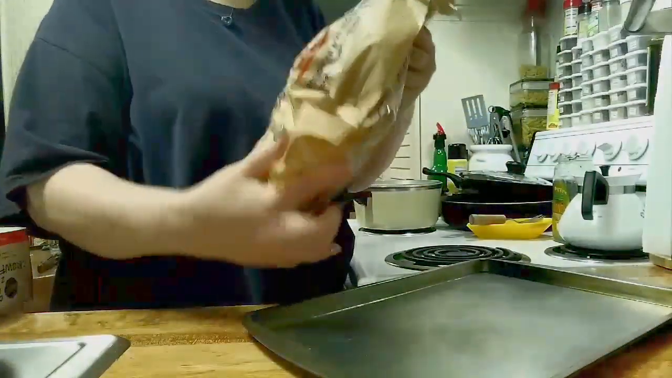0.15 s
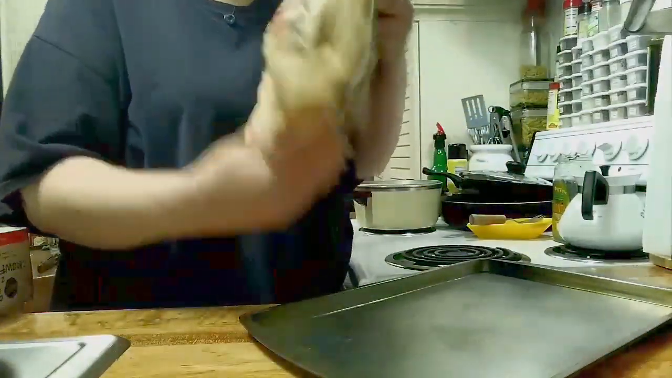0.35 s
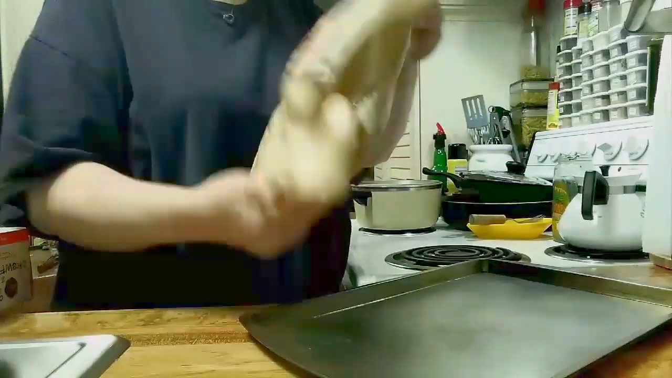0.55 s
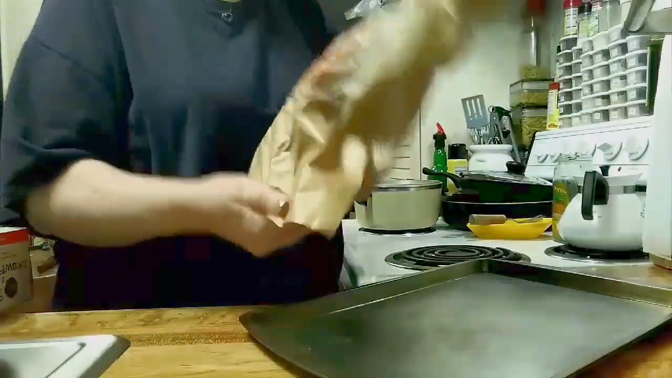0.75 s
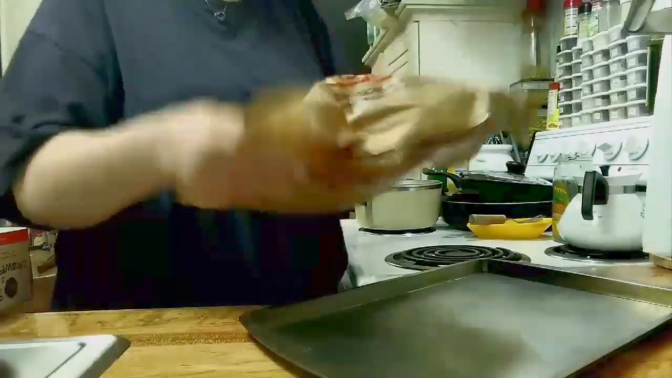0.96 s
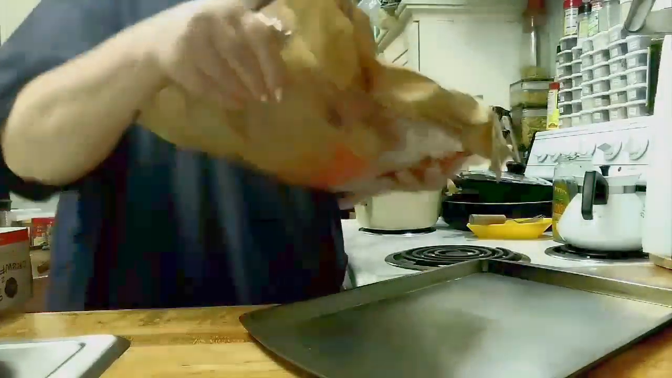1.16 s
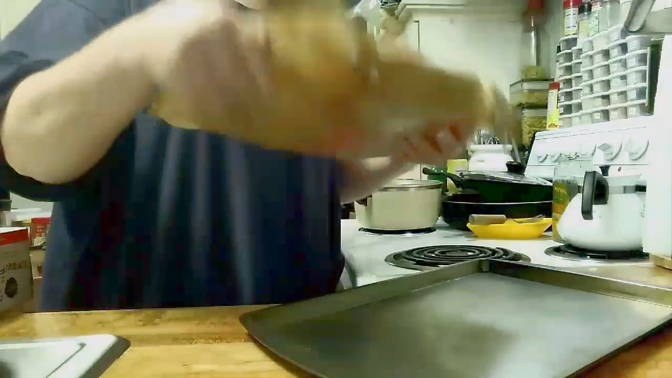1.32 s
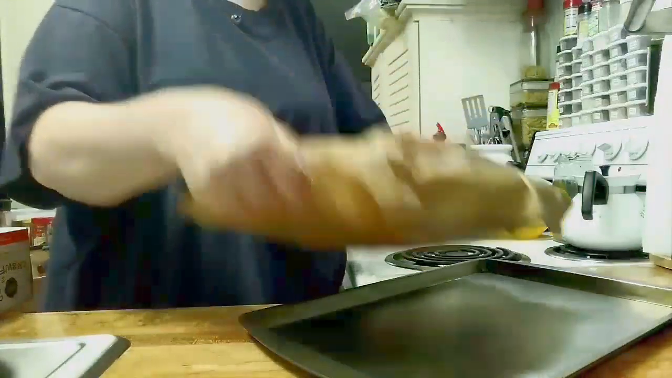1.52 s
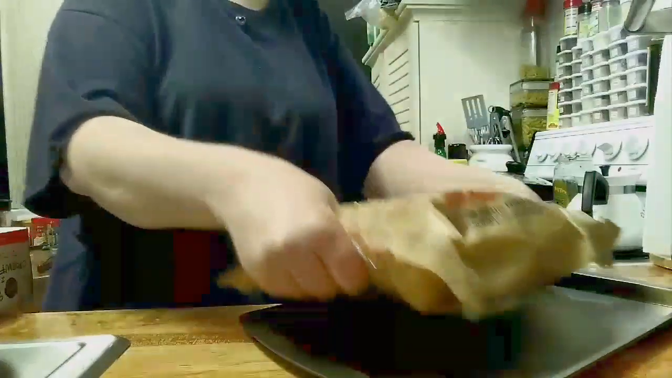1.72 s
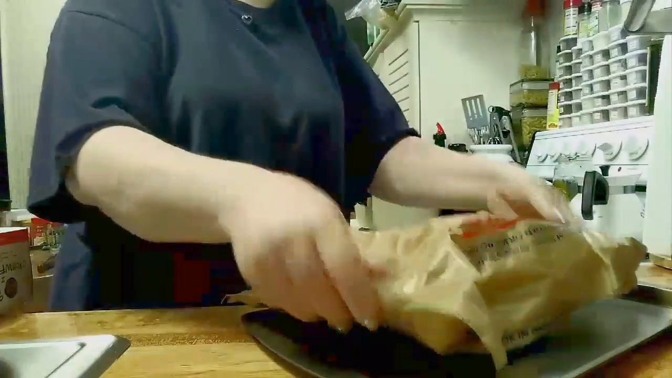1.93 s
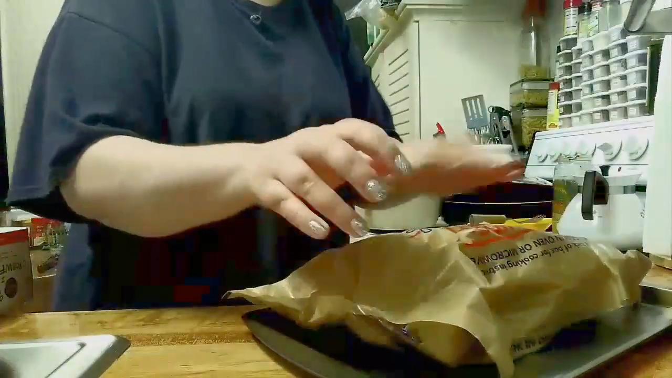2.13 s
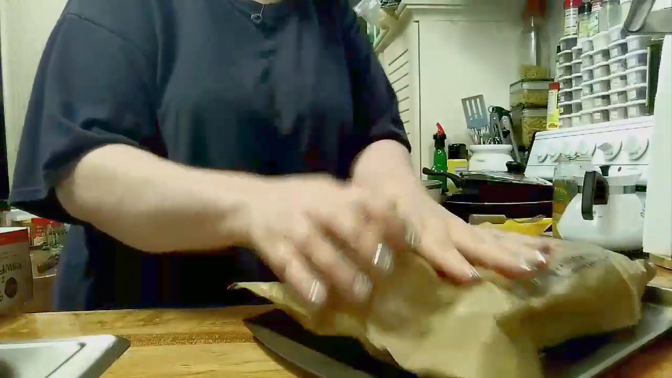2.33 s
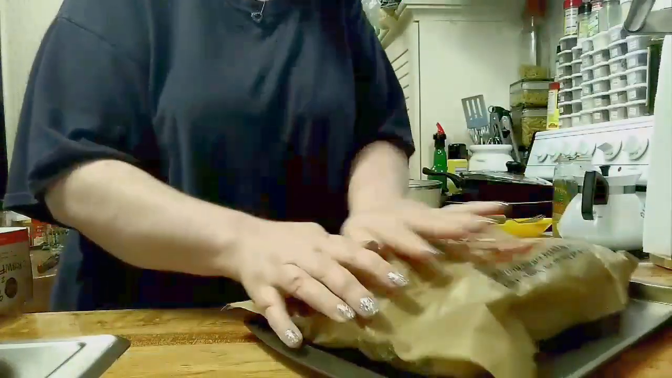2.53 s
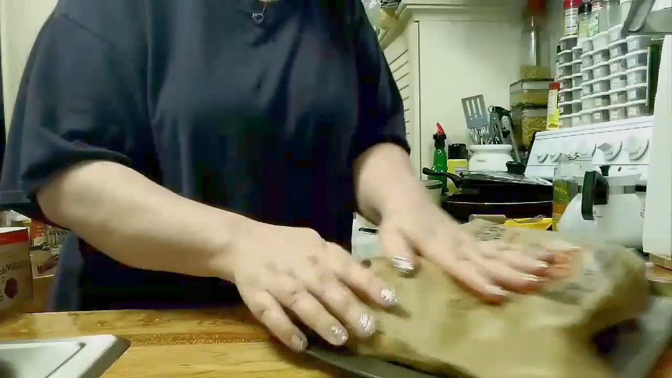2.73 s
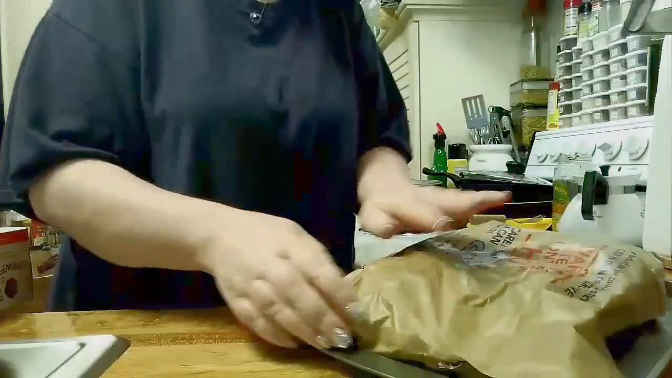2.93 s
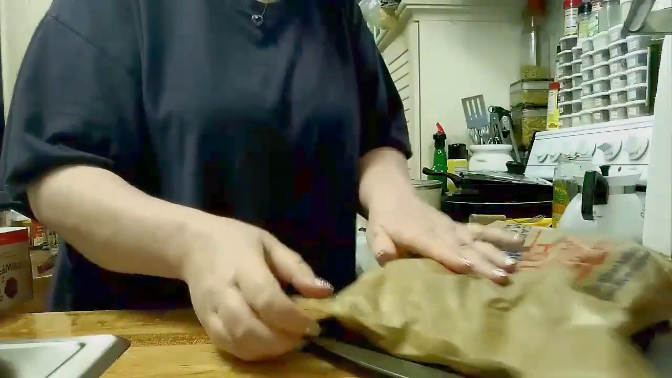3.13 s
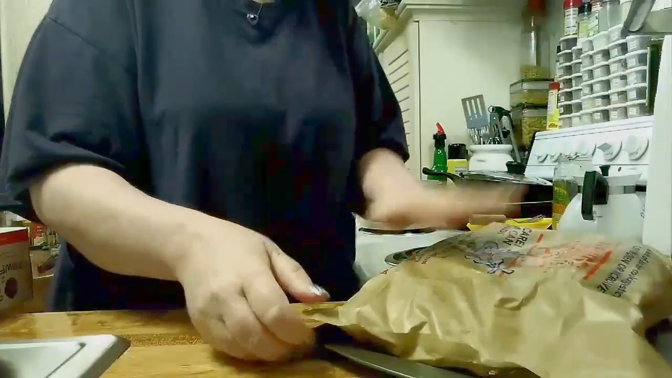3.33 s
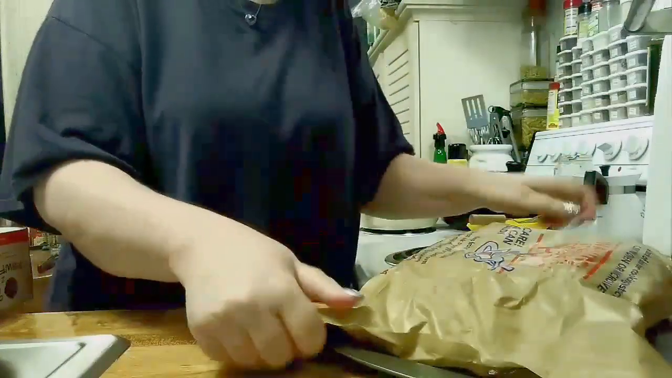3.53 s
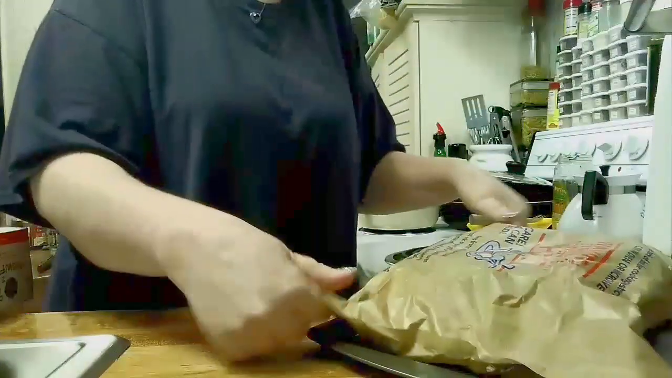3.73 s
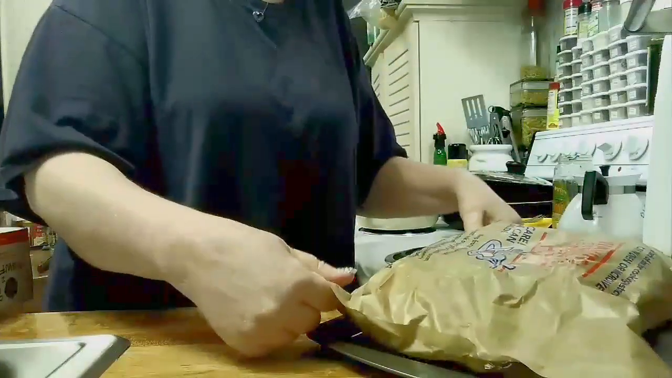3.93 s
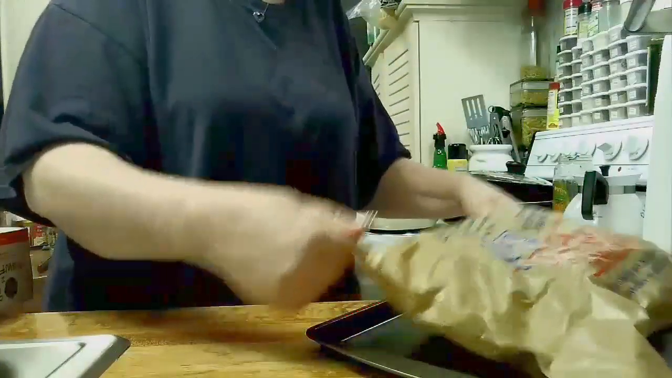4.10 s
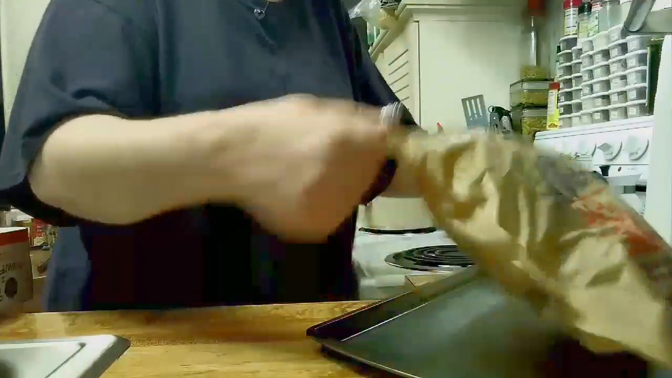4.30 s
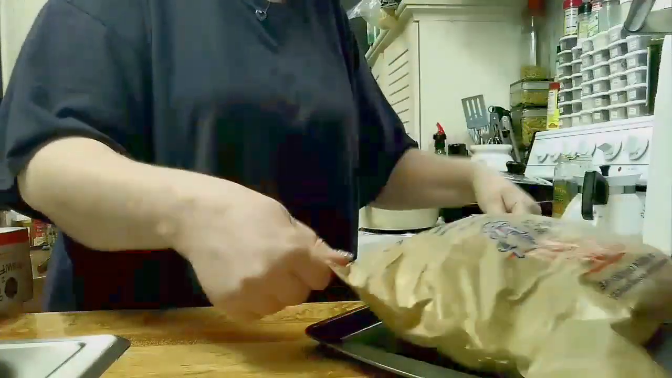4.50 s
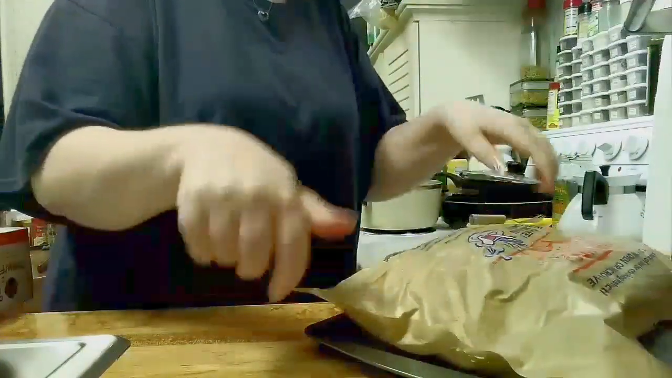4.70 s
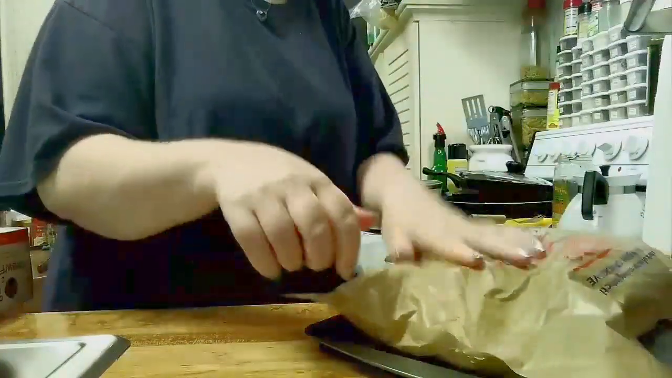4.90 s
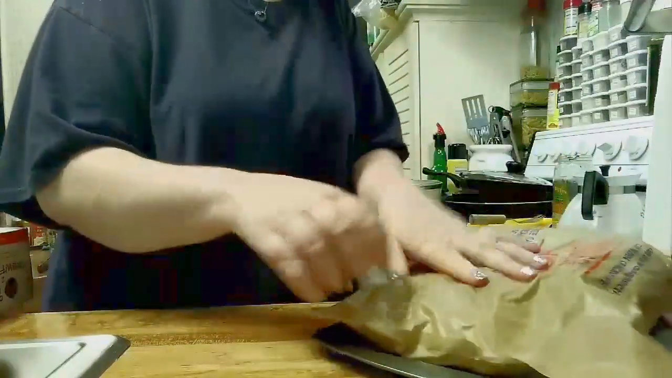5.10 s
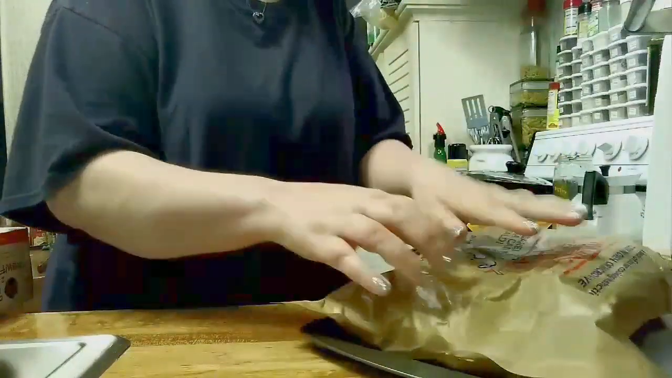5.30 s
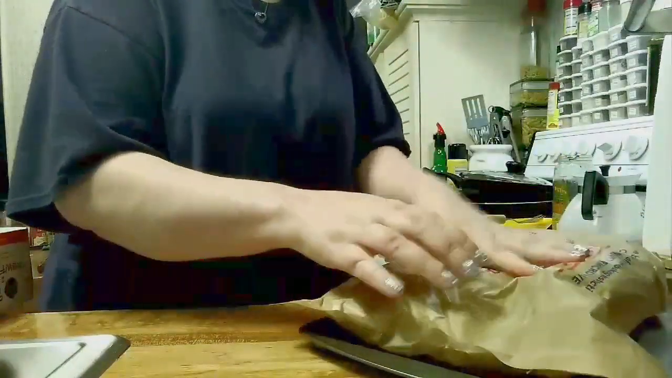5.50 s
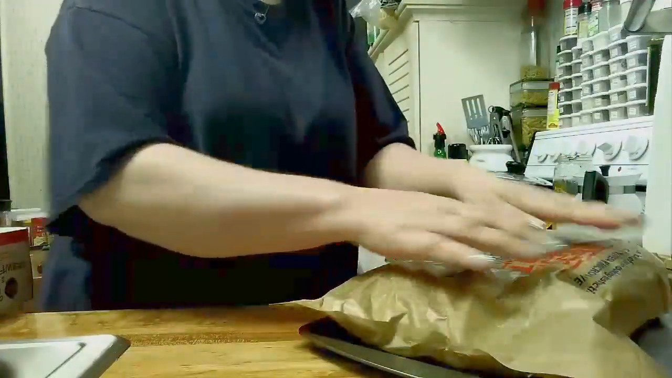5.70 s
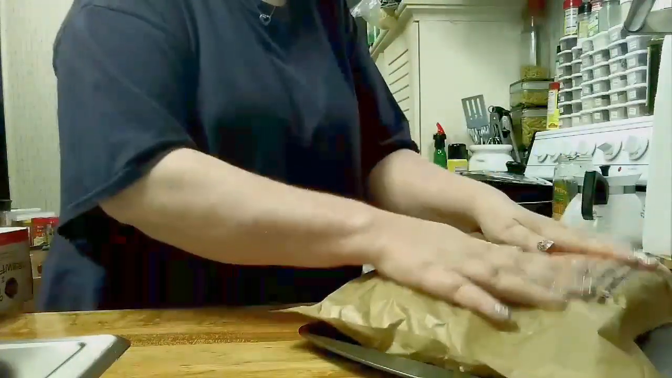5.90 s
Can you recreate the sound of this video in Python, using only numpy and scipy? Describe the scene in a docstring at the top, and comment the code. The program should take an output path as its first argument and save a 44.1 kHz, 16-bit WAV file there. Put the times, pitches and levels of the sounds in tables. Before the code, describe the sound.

Loud, continuous crisp paper crinkling comes first, full of tiny clicks and hard cracks. Then the bag is set down with cushioned thumps, and hand presses make separate crackling bursts. A near lull holds small ticks and a faint tray scrape; one end is lifted with a swelling rustle and shifting contents, then it settles into sparse soft crackles. Close microphone, short kitchen reflections, faint low room rumble.

```python
"""A stiff paper cooking bag is shaken and turned in the hands, laid on a baking tray, patted, tugged and patted again.
Its creases buckle in swarms of tiny filtered-noise clicks, with single loud snaps among them and popping panels.
The contents slide and thud as dull noise over low decaying sines; the dragged tray rings faintly from random slips.
A small kitchen answers with short noise echoes over a faint low rumble, heard by one nearby microphone."""
import sys
import numpy as np
from scipy import signal
from scipy.fft import rfft, irfft, next_fast_len
from scipy.io import wavfile
from scipy.ndimage import uniform_filter1d, map_coordinates

SR = 44100
rng = np.random.default_rng(int(sys.argv[2]) if len(sys.argv) > 2 else 0)


def log_audio(samples):
    """Write samples as a 16-bit WAV file to the path given in sys.argv[1]."""
    # one column per channel
    frames = np.atleast_2d(samples).T
    # limit to full scale, then quantise
    limited = np.clip(frames, -1, 1)
    pcm = np.round(limited * 32767).astype(np.int16)
    wavfile.write(sys.argv[1], SR, pcm)


N = 262394  # length in samples


def amp(db):
    """Decibels to gain."""
    return 10 ** (np.asarray(db) / 20)


def unit(x):
    """Scale to rms 1."""
    return x / np.sqrt(np.mean(x ** 2) + 1e-20)


def along(points, hz):
    """Read (Hz, value) points on a log frequency axis."""
    point_hz, value = np.transpose(points)
    return np.interp(np.log(hz + 1), np.log(point_hz + 1), value)


def curve(points):
    """Read (s, value) points at every sample."""
    return np.interp(np.arange(N) / SR, *np.transpose(points))


def wobble(rate):
    """A smooth random curve, rate knots a second."""
    knots = rng.standard_normal(int(N * rate / SR) + 4)
    return map_coordinates(knots, [np.arange(N) * rate / SR])


def coloured(x, spectrum, size=4096):
    """Pass x through a causal (minimum-phase) filter of unit energy with the given spectrum."""
    cepstrum = irfft(np.log(amp(along(spectrum, np.fft.rfftfreq(size, 1 / SR)))))
    # folding the cepstrum forward in time makes the filter causal
    cepstrum[1:size // 2] *= 2
    cepstrum[size // 2 + 1:] = 0
    kernel = irfft(np.exp(rfft(cepstrum)))
    return signal.oaconvolve(x, kernel / np.linalg.norm(kernel))[:len(x)]


def add(track, s, sound):
    """Mix a sound into the track at time s."""
    part = track[max(round(s * SR), 0):][:len(sound)]
    part += sound[:len(part)]


def burst(t60, size=2048):
    """Dense damped ringing: noise that falls 60 dB in t60 seconds."""
    return rng.standard_normal(size) * amp(-60 * np.arange(size) / SR / t60)


def swell(ring, rise_s):
    """Let a ring build up with the time constant rise_s."""
    return ring * (1 - np.exp(-np.arange(len(ring)) / SR / rise_s))


# colour of the room's background: pitch_hz, level_db (relative)
ROOM_COLOUR = [(18, -31), (30, -13), (70, 0.5), (110, -9), (190, -6), (340, -4.5), (600, -13), (900, -23),
               (3580, -30), (12000, -20.5), (16000, -27)]
AIR_DB = -66.5  # rms level


def air():
    """The faint steady background of the room: noise coloured mostly to a low rumble."""
    return amp(AIR_DB) * unit(coloured(rng.standard_normal(N), ROOM_COLOUR))


# decay of the kitchen's tail: pitch_hz, t60_s
ROOM_DECAY = [(150, 0.24), (600, 0.27), (2000, 0.21), (6000, 0.15), (14000, 0.2)]


def room_tail():
    """Noise whose frequency bands each die away at the room's own rate."""
    hz, t, z = signal.stft(rng.standard_normal(SR // 3), SR, nperseg=256)
    decay = amp(-60 * t / along(ROOM_DECAY, hz)[:, None])
    return signal.istft(z * decay, SR, nperseg=256)[1]


def kitchen(x, near_db=-6.5, near_t60=0.026, wall_db=-13.0, room_db=-12):
    """Counter and tray reflect at once, then the nearest wall and a short tail; paths change as the bag moves."""
    out = np.zeros(N)
    hop = SR // 10  # new paths fade in every tenth of a second
    for start in range(0, N + hop, hop):
        first = max(start - hop, 0)
        part = x[first:start + hop]
        part = part * np.cos(np.pi / 2 * (first + np.arange(len(part)) - start) / hop)
        # response, level in dB, delay in s
        paths = [(burst(near_t60), near_db, .0014),
                 (burst(0.0028), wall_db, .0064),
                 (room_tail(), room_db, .0067)]
        for response, db, delay in paths:
            echo = signal.fftconvolve(part, response / np.linalg.norm(response))
            add(out, first / SR + delay, amp(db) * echo)
    return x + out


# resonances of the baking tray: pitch_hz, level_db (relative), t60_s
TRAY_MODES = [(511, -4, 0.065), (723, -6, 0.057), (1074, 0, 0.054), (1735, 9, .045), (1920, 4, 0.02),
              (3700, 9, 0.008)]
# strength of the drag under the bag: time_s, level_db
TRAY_DRAG = [(3.3, -86), (3.325, -67), (3.35, -51), (3.41, -55), (3.429, -46), (3.48, -82), (3.5, -100)]


def tray(slip_rate=900):
    """The dragged tray sticks and slips: random impulses ring its modes faintly and roughly."""
    t = np.arange(SR // 4) / SR
    ring = sum(amp(db - 60 * t / t60) * np.sin(2 * np.pi * hz * t) for hz, db, t60 in TRAY_MODES)
    slips = (rng.random(N) < slip_rate / SR) * rng.uniform(-1.9, 1, N)
    scrape = signal.fftconvolve(slips, ring)[:N]
    return amp(curve(TRAY_DRAG)) * unit(scrape)


# the filled bag lands or is patted: start_s, level_db (relative)
PAT_HITS = [(1.851, -36), (2.152, -39), (2.34, -39), (2.457, -41), (2.62, -47), (2.873, -32.5),
            (2.915, -37), (4.229, -34), (4.498, -38.5), (4.806, -33), (5.262, -29)]
# boom of the counter and of the air in the bag: pitch_hz, level_db (relative)
BOOM_MODES = [(62, 1), (162, 0)]
# dull colour of the moving contents, also for filling(): pitch_hz, level_db (relative)
CONTENTS_COLOUR = [(25, -25), (60, -12.5), (120, 5), (200, 1), (310, 8), (450, 4.5), (900, -5.5),
                   (3000, -77)]
CUSHION_S, THUD_T60 = .008, .2  # rise time constant and decay of the cushioned thud, s


def pats(level_db=-7.0, rattle_db=-9):
    """The soft filling thuds on the tray: counter and bag boom as sines, the contents shudder as noise."""
    out = np.zeros(N)
    t = np.arange(SR // 3) / SR
    for s, db in PAT_HITS:
        boom = np.zeros(len(t))
        for hz, level in BOOM_MODES:
            scattered_hz = hz * rng.normal(1, 0.073)
            boom += amp(level - 60 * t / THUD_T60) * np.sin(2 * np.pi * scattered_hz * t)
        shudder = coloured(burst(THUD_T60, size=len(t)), CONTENTS_COLOUR)
        thud = swell(boom + amp(rattle_db) * shudder, CUSHION_S)
        add(out, s, amp(db + level_db) * thud)
    return out


# how freely the contents move, loose in the air, still on the tray, sliding when tilted:
# time_s, level_db (relative)
CONTENTS_FREEDOM = [(1.3, -1), (1.5, -1.5), (3.15, -4), (3.25, -20), (3.84, -22), (3.9, 3), (4.3, 9),
                    (4.55, 1.5), (5.0, 1.5)]


def filling(hollow, level_db=-50, follow=0.6, inertia_s=0.031, lump_db=3):
    """The contents slide and bump dully on the paper walls: lumpy noise follows the panels sluggishly."""
    sluggish = uniform_filter1d(hollow, int(inertia_s * SR) + 1)
    level = curve(CONTENTS_FREEDOM) + follow * (sluggish + 30)
    slide = coloured(rng.standard_normal(N), CONTENTS_COLOUR)
    lumps = unit(amp(lump_db * wobble(35)) * slide)
    return amp(level + level_db) * lumps


FOLD_RUN_S = .0014  # time the buckle takes to run along its fold


def snap(t60, spectrum, tone_db):
    """One quick ring of a fold with a tone of its own; its energy equals 2 ms at rms 1."""
    own = [(hz, db + rng.normal(0, tone_db)) for hz, db in spectrum]
    t = np.arange(2048) / SR
    running = np.minimum(2 * t / FOLD_RUN_S, 1) * amp(-60 * np.maximum(t - FOLD_RUN_S, 0) / t60)
    ring = coloured(running * rng.standard_normal(len(t)), own, size=1024)
    return ring / np.linalg.norm(ring) * np.sqrt(SR / 500)


# bright colour of a snapping fold: pitch_hz, level_db (relative)
CRACK_COLOUR = [(2000, -22), (5000, -11.5), (9000, -5), (11800, 3), (16000, -12)]
CRACK_T60 = .007  # s


def crack(tone_db):
    """A fold snaps through: a sharp noise crack that is over almost at once."""
    return snap(CRACK_T60, CRACK_COLOUR, tone_db)


# hollow colour of a flipping panel: pitch_hz, level_db (relative)
POP_COLOUR = [(60, -22), (200, -17), (300, -9.5), (540, 1), (800, -5), (1300, 0), (2100, 0), (2800, -3),
              (4200, -4.5), (6000, -14.5), (10000, -15)]
# the panel's note: centre pitch (Hz), scatter (octaves), share of the pop's power (0-1), decay (s)
NOTE_HZ, NOTE_OCTAVES, NOTE_SHARE, NOTE_T60 = 1850, .2, .16, .012


def panel_pop(t60):
    """A panel flips: a broad slap and a brief sine note, higher or lower with the panel's size."""
    slap = snap(t60, POP_COLOUR, tone_db=1.0)
    t = np.arange(len(slap)) / SR
    hz = NOTE_HZ * 2 ** rng.normal(0, NOTE_OCTAVES)
    note = swell(np.sin(2 * np.pi * hz * t) * amp(-60 * t / NOTE_T60), FOLD_RUN_S / 2)
    return np.sqrt(1 - NOTE_SHARE) * slap + np.sqrt(NOTE_SHARE) * unit(note) * slap.std()


# large folds that snap through: start_s, crack_db (relative), pop_db (relative)
LARGE_SNAPS = [(0.002, -14, -35), (0.0102, -13, -41), (0.016, -18.5, -41), (0.031, -19.5, -43),
               (0.0406, -19, -37.5), (0.053, -16, -48), (0.0665, -19, -46), (0.115, -18.5, -48),
               (0.129, -24, -42), (0.1418, -17, -32), (0.165, -22, -47), (0.184, -17, -37),
               (0.312, -19, -29.5), (0.3396, -18.5, -25), (0.441, -12.5, -37), (0.61, -18, -33.5),
               (0.7117, -22, -36), (0.9463, -20, -37), (0.9712, -18, -33), (1.168, -14.5, -28),
               (1.266, -18.5, -31), (1.3555, -18, -44), (1.3649, -23.5, -44), (1.3937, -24, -28.5),
               (1.4328, -19.5, -31.5), (1.4697, -16.5, -44.5), (1.5013, -25, -31), (1.5178, -19, -32),
               (1.5513, -24.5, -40), (1.565, -28.5, -47), (1.6007, -27, -25), (1.624, -24, -46),
               (1.6776, -18.5, -29), (1.681, -26.5, -32.5), (1.7282, -24, -46), (1.742, -27, -44.5),
               (1.755, -24.5, -35), (1.7724, -20.5, -33.5), (1.803, -17.5, -48), (1.8264, -18.5, -37),
               (1.9178, -21, -29), (1.9895, -30, -43), (2.042, -38, -50), (2.0553, -22.5, -33),
               (2.1253, -20, -30), (2.215, -14.5, -36), (2.2204, -14.5, -24), (2.325, -23, -35.5),
               (2.34, -18.5, -16.5), (2.3706, -21, -36), (2.4155, -18, -41), (2.4199, -18.5, -26),
               (2.4452, -21, -40.5), (2.4572, -27, -24), (2.553, -17.5, -36.5), (2.6168, -25.5, -34),
               (2.6862, -21, -30.5), (2.8374, -38.5, -43.5), (2.879, -30.5, -33.5), (2.902, -27, -32),
               (2.914, -15.5, -31.5), (3.0016, -16.5, -29.5), (3.0647, -32, -30), (3.0816, -23.5, -26.5),
               (3.139, -25, -40), (3.147, -29, -26), (3.3823, -48, -39), (3.4005, -37, -45),
               (3.419, -28, -28), (3.65, -26.5, -35), (3.6905, -37, -32), (3.6993, -32, -28),
               (3.7088, -31, -42), (3.8025, -41, -43), (3.8256, -15.5, -34), (3.864, -32, -30),
               (3.9551, -25.5, -27), (4.002, -19, -38), (4.019, -19, -37), (4.0411, -22.5, -32.5),
               (4.111, -19.5, -28), (4.1608, -28, -23), (4.184, -24.5, -30), (4.258, -11, -30),
               (4.352, -20.5, -24.5), (4.3823, -25, -34), (4.4424, -33, -30.5), (4.456, -32, -27.5),
               (4.7352, -46.5, -44.5), (4.7497, -39, -47.5), (4.779, -25, -46), (4.8016, -13, -20.5),
               (4.865, -22, -27.5), (4.876, -24, -43), (4.9269, -20.5, -37), (4.9784, -25.5, -29.5),
               (5.078, -45, -38), (5.188, -29.5, -33.5), (5.2586, -16.5, -40), (5.3074, -31.5, -23.5),
               (5.395, -41, -32), (5.4725, -31.5, -43), (5.5097, -32.5, -35), (5.5705, -37, -32),
               (5.6641, -29, -29.5), (5.674, -26.5, -33), (5.679, -24.5, -27), (5.8064, -27, -37),
               (5.9444, -29.5, -47)]


def snaps(pop_t60=0.028, crack_db=0.0, pop_db=2.0):
    """A large fold flips: a sharp crack and a slightly longer pop of the panel."""
    out = np.zeros(N)
    for s, crack_level, pop_level in LARGE_SNAPS:
        add(out, s, amp(crack_level + crack_db) * crack(tone_db=3))
        add(out, s, amp(pop_level + pop_db) * panel_pop(pop_t60))
    return out


def small_snaps(crisp, hollow, rate=18, crack_db=0.0, pop_db=-1, spread_db=2.5, pop_t60=0.045):
    """Smaller folds flip at random, as strongly as the paper is being worked."""
    out = np.zeros(N)
    for i in np.flatnonzero(rng.random(N) < rate / SR):
        size_db = spread_db * rng.uniform(-2.5, 1.1)
        add(out, i / SR, amp(crisp[i] + size_db + crack_db) * crack(tone_db=1.5))
        add(out, i / SR, amp(hollow[i] + size_db + pop_db) * panel_pop(pop_t60))
    return out


# the hands take up the paper almost at once; let go, it settles
GRAB_DB_PER_S, SETTLE_DB_PER_S = 4001, 298.5


def settling(t, start, end):
    """Level in dB of a movement's edges: a quick grab before its start, the paper settling after its end."""
    return -GRAB_DB_PER_S * np.maximum(start - t, 0) - SETTLE_DB_PER_S * np.maximum(t - end, 0)


# the bag is shaken and turned in the air: time_s, crackle_db, rustle_db (both relative)
SHAKING = [(0.0, -22.5, -34), (0.03, -31.5, -45.5), (0.075, -29.5, -39), (0.135, -24, -31),
           (0.171, -35.5, -45.5), (0.215, -17.5, -28), (0.29, -20, -30), (0.346, -17, -24.5),
           (0.39, -16.5, -23.5), (0.42, -20.5, -29.5), (0.45, -19.5, -26), (0.488, -22.5, -29),
           (0.531, -17, -25), (0.57, -23, -31.5), (0.63, -22, -30.5), (0.67, -19.5, -26),
           (0.75, -20.5, -27), (0.768, -21, -30.5), (0.86, -17.5, -25.5), (0.899, -20, -28),
           (0.936, -27.5, -37), (0.962, -22.5, -33.5), (0.984, -17.5, -26), (1.07, -19.5, -28.5),
           (1.134, -23.5, -33.5), (1.18, -18.5, -25.5), (1.266, -22, -30.5), (1.284, -17, -24.5),
           (1.388, -29, -36.5), (1.46, -31.5, -38.5), (1.497, -36.5, -39), (1.562, -52, -58),
           (1.59, -46.5, -67)]
# it is tugged up by one end and let down again: time_s, crackle_db, rustle_db (both relative)
TUGGING = [(3.841, -35, -40), (3.858, -40.5, -40.5), (4.011, -27.5, -32.5), (4.272, -22, -27.5),
           (4.313, -18.5, -23), (4.418, -37.5, -42.5), (4.43, -49, -43.5)]
# a hand grips or presses the paper:
# start_s, squeeze_s, hold_s, crackle_db, rustle_db (both relative)
HAND_PRESSES = [(0.326, 0.011, 0.0061, -20, -20), (1.605, 0.006, 0.03, -42.5, -43.5),
                (1.66, 0.0075, 0.16, -35, -40), (1.793, 0.056, 0.046, -22, -29),
                (1.96, 0.0039, 0.096, -47, -51.5), (2.117, 0.015, 0.024, -22.5, -28.5),
                (2.186, .01, .04, -30, -32), (2.224, 0.012, 0.042, -23.5, -29.5),
                (2.329, 0.025, 0.025, -25.5, -30), (2.388, 0.007, 0.05, -32.5, -34.5),
                (2.426, 0.018, 0.064, -28.5, -32), (2.487, 0.031, 0.054, -21.5, -27.5),
                (2.59, 0.0081, 0.061, -31.5, -37.5), (2.668, 0.01, 0.035, -30, -33),
                (2.702, 0.0082, 0.039, -34.5, -37), (2.876, 0.02, 0.061, -37, -39.5),
                (2.938, 0.021, 0.034, -27.5, -35), (3.055, 0.073, 0.02, -30.5, -33),
                (3.494, 0.01, 0.0084, -47.5, -54.5), (3.554, .01, .05, -55, -68),
                (3.599, 0.057, 0.0092, -44, -44), (3.681, 0.0074, 0.0052, -40.5, -43),
                (3.749, 0.0032, 0.049, -46.5, -55.5), (4.437, 0.0048, 0.1, -32, -37.5),
                (4.772, 0.051, 0.0071, -25.5, -25), (4.845, 0.0083, 0.026, -31, -35),
                (4.928, 0.0037, 0.088, -31.5, -35.5), (5.072, 0.029, 0.023, -42, -43.5),
                (5.177, 0.0025, 0.0046, -40, -50), (5.258, 0.0066, 0.018, -20, -25),
                (5.295, 0.0076, 0.019, -27.5, -32), (5.371, 0.0079, 0.065, -43, -41.5),
                (5.494, 0.0068, 0.0045, -44, -47), (5.527, .01, 0.076, -63, -60),
                (5.66, 0.007, 0.02, -35.5, -32), (5.691, 0.12, 0.011, -26.5, -28),
                (5.821, 0.0079, 0.079, -39, -39)]
SQUEEZE_DB, EASE_DB_PER_S = 12.5, 17  # a press swells, then eases a little while held


def handling():
    """How hard the paper is worked: crackle and rustle in dB per sample, set by the strongest movement."""
    t = np.arange(N) / SR
    levels = np.full((2, N), -100.)
    for movement in SHAKING, TUGGING:
        s, crisp, hollow = np.transpose(movement)
        moving = np.array([np.interp(t, s, crisp), np.interp(t, s, hollow)])
        levels = np.maximum(levels, moving + settling(t, s[0], s[-1]))
    for s, squeeze, hold, crisp, hollow in HAND_PRESSES:
        end = s + squeeze + hold
        shape = np.interp(t, [s, s + squeeze, end], [-SQUEEZE_DB, 0, -EASE_DB_PER_S * hold])
        shape = shape + settling(t, s, end)
        levels = np.maximum(levels, [crisp + shape, hollow + shape])
    return levels


BUCKLE_SPREAD_DB = 1.2  # scale of the random size differences


def buckles(rate, spread_db):
    """Random clicks at the given rate per second, most small and a few large."""
    happen = rng.random(N) < rate / SR
    return happen * amp(spread_db * np.minimum(rng.exponential(size=N), 4))


def facets(clicks, t60, count=16, size=1024):
    """Each click rings one of the bag's many facets by its own tone; new facets form as the bag deforms."""
    out = np.zeros(N)
    hop = SR // 6  # a fresh set of facets six times a second
    struck = clicks * (rng.integers(count, size=N) == np.arange(count)[:, None])
    for start in range(0, N, hop):
        rings = np.array([burst(t60, size=size) for _ in range(count)])
        rings /= np.linalg.norm(rings, axis=1, keepdims=True)
        ringing = signal.fftconvolve(struck[:, start:start + hop], rings, axes=1)
        add(out, start / SR, ringing.sum(axis=0))
    return out


def sheet(clicks, sliding, t60):
    """Paper under the hands: ringing facets give way to hiss by the share of sliding."""
    return np.sqrt(1 - sliding ** 2) * facets(clicks, t60) + sliding * rng.standard_normal(N)


def flexing(x, depth_db, width_hz, hold_s):
    """As the paper bends, its resonances come and go in patches of frequency and time."""
    z = signal.stft(x, nperseg=256)[2]
    bins, frames = z.shape
    rows = np.arange(bins) * SR / 256 / width_hz
    cols = np.arange(frames) * 128 / SR / hold_s
    knots = rng.standard_normal((128, 2048))
    field = map_coordinates(knots, np.meshgrid(rows, cols, indexing="ij"), mode="mirror")
    gain = amp(depth_db * np.tanh(field))
    gain /= np.sqrt(np.mean(gain ** 2))
    return signal.istft(z * gain, nperseg=256)[1][:N]


# colour of the creases: pitch_hz, level_db (relative)
CREASE_COLOUR = [(1500, -32), (3200, -13), (4100, -20.5), (5200, -8), (7000, -8), (9000, -5.5),
                 (11500, 1.5), (13500, -2), (15500, -9), (16000, -22)]
# colour of the panels in the air: pitch_hz, level_db (relative)
PANEL_COLOUR = [(30, -49), (60, -14), (150, -10), (380, -5), (510, 3), (640, -1), (720, -2.5), (850, -5.5),
                (1050, -3), (1400, -5.5), (2100, -0.5), (2900, -2), (4100, 3.5), (6000, -15), (10000, -39)]
# colour of the panels pressed against the tray: pitch_hz, level_db (relative)
PRESSED_COLOUR = [(30, -25), (60, -15.5), (150, -16), (380, -11), (500, 0.5), (640, 1), (710, -4.5),
                  (880, -3), (1400, -2), (2200, -1.5), (2900, -5), (4100, -5.5), (6000, -12), (10000, -30)]
# sliding hiss in the rustle, more under a light touch: crackle_db, share (0-1)
SLIDING_SHARE = [(-55, .75), (-35, .25)]
LANDING_S = 1.29  # the bag comes to rest on the tray
FACET_T60 = .018  # ringing of a crease's facet, s


def crinkle(crisp, hollow, busy_rate=1900, rate_db=0.56, share_s=.016, crisp_db=-0.55, hollow_db=-1,
            flutter_db=1.03):
    """Harder handling buckles more creases; each one clicks and shakes the panel beside it."""
    t = np.arange(N) / SR
    # busy_rate clicks a second at a crackle level of -20 dB
    clicks = buckles(busy_rate * amp(rate_db * (crisp + 20.0)), spread_db=BUCKLE_SPREAD_DB)
    # neighbouring buckles share the work that the hands put in, and come in clusters
    power = np.abs(uniform_filter1d(clicks ** 2, int(share_s * SR) + 1))
    clicks = clicks / np.sqrt(power + 1e-4) * amp(flutter_db * wobble(60))
    # under a light touch the sheets mostly slide and hiss instead of buckling
    sliding = np.interp(crisp, *np.transpose(SLIDING_SHARE))
    creases = coloured(sheet(clicks, sliding, t60=FACET_T60), CREASE_COLOUR)
    flaps = sheet(clicks, sliding, t60=0.01)
    # pressed against the tray, the panels sound hollower than in the air
    resting = np.clip((t - LANDING_S) / 1.16, 0, 1)
    panels = (1 - resting) * coloured(flaps, PANEL_COLOUR) + resting * coloured(flaps, PRESSED_COLOUR)
    creases = flexing(creases, depth_db=4.0, width_hz=474.0, hold_s=.02)
    panels = flexing(panels, depth_db=2.5, width_hz=617, hold_s=.025)
    return amp(crisp + crisp_db) * creases + amp(hollow + hollow_db) * panels


def scene(bag_db=-1):
    """Bag and tray sound together in the kitchen, over the room's background."""
    crisp, hollow = handling()
    paper = crinkle(crisp, hollow) + snaps() + small_snaps(crisp, hollow)
    sources = paper + filling(hollow) + pats() + tray()
    return (amp(bag_db) * kitchen(sources) + air())[None]


TOP_HZ = 15950  # band limit


def record(dry):
    """The microphone's signal chain rounds off the highest peaks and keeps nothing above its band limit."""
    rounded = dry / (1 + (dry / .5) ** 4) ** .25
    size = next_fast_len(N + SR // 4)
    in_band = np.fft.rfftfreq(size, 1 / SR) < TOP_HZ
    return irfft(rfft(rounded, size) * in_band, size)[:, :N]


dry = scene()
out = record(dry)
log_audio(out)
```